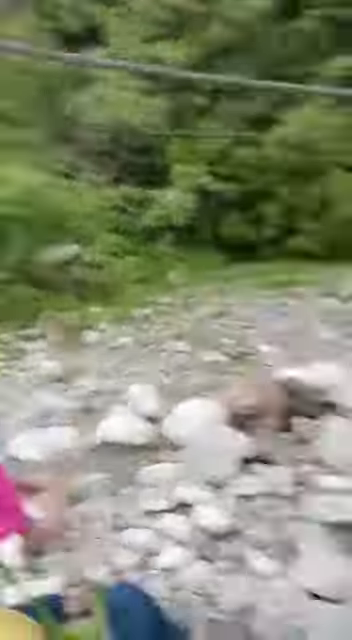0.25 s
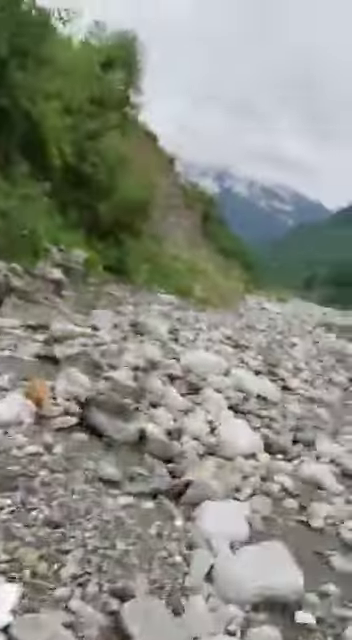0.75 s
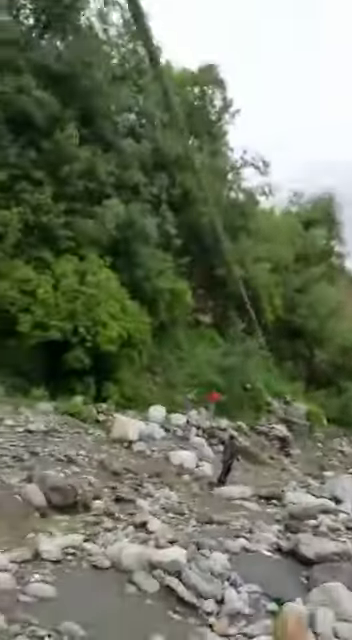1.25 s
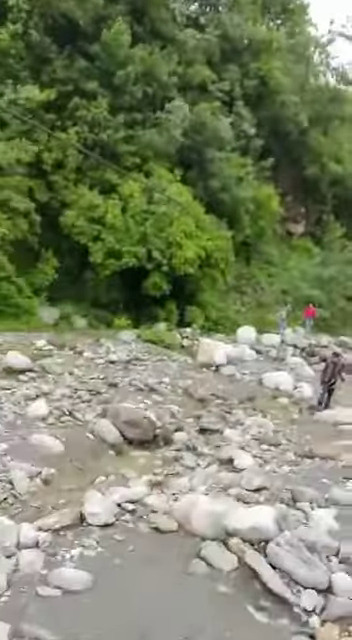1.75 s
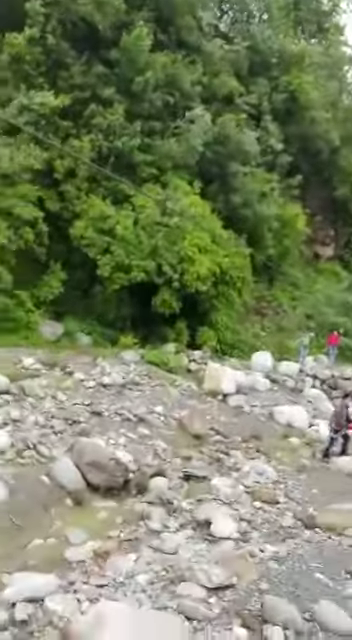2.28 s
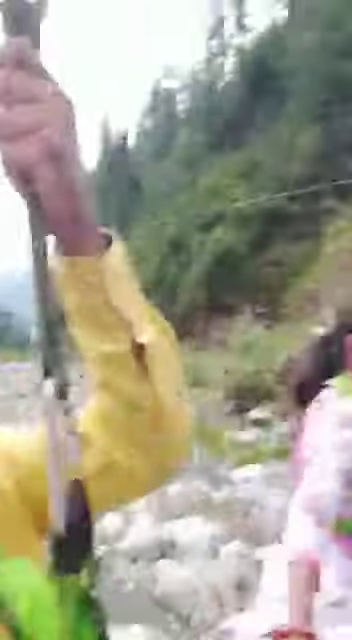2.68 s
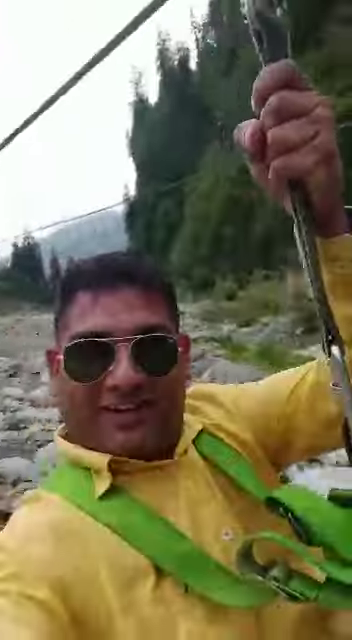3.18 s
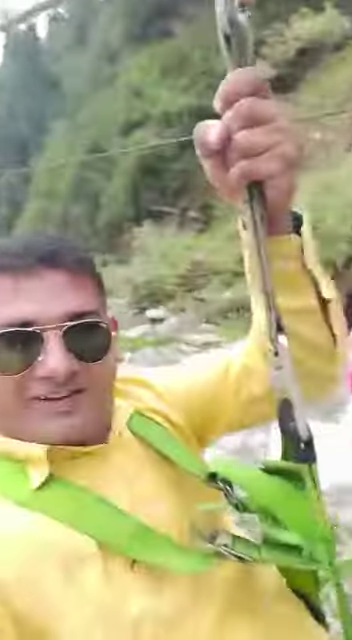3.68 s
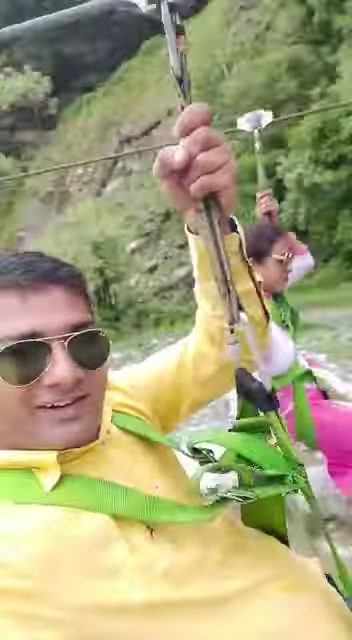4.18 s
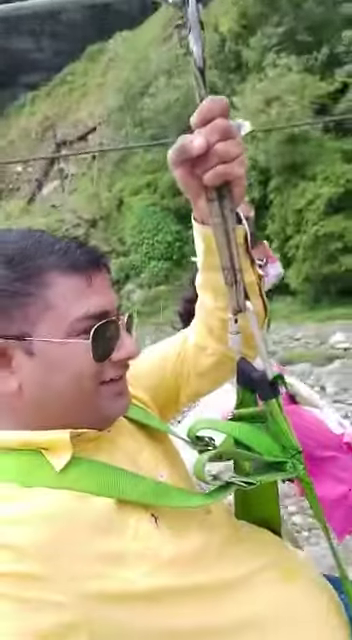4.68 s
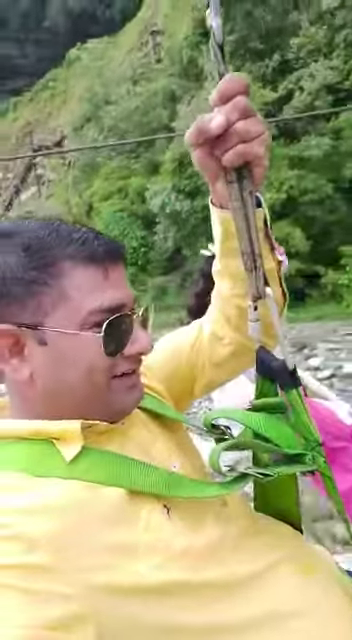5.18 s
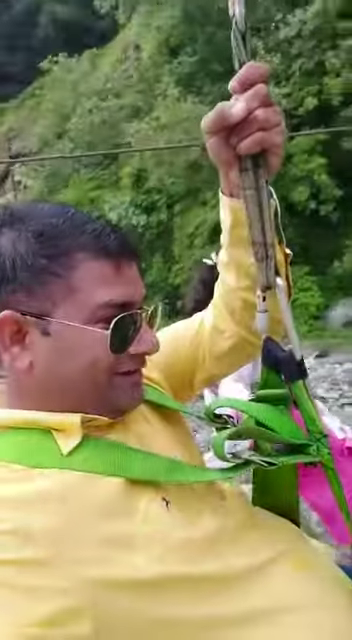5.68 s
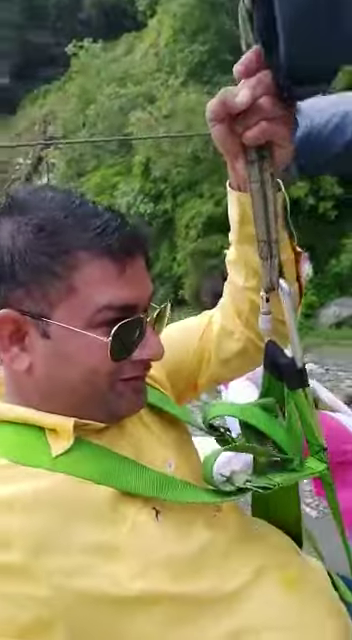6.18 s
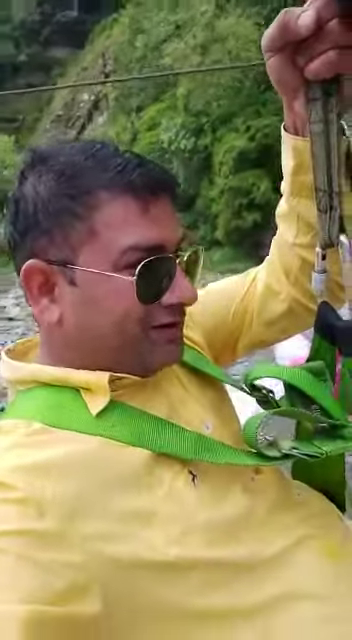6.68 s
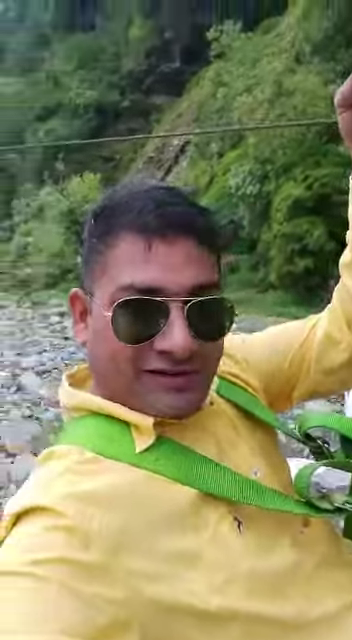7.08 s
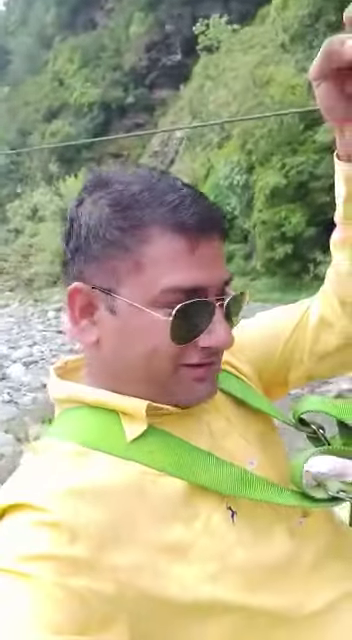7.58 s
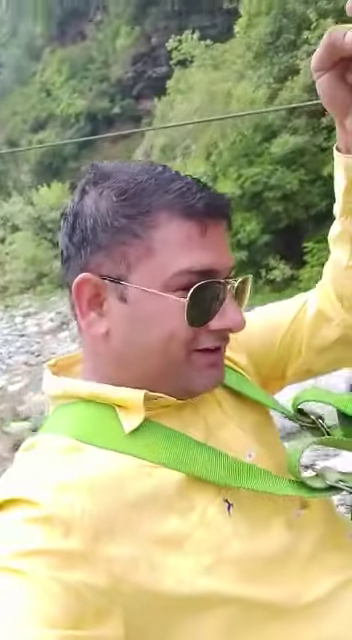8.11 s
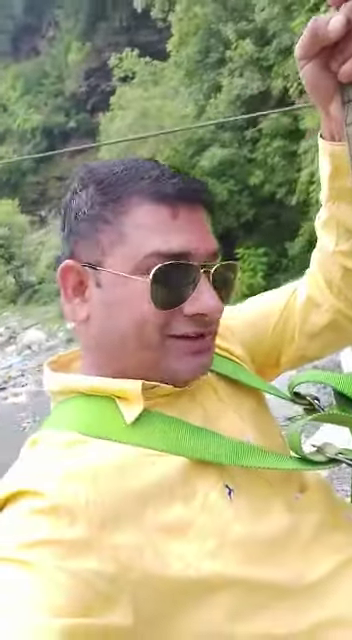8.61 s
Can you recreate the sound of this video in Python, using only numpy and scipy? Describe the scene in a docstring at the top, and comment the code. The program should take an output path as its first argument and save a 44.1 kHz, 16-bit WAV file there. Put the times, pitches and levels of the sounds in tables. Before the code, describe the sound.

Metal pulley wheels whir and hiss loudly along a twisted steel cable, buzz slowly sinking in pitch, with wind thumps and a late low hum.

```python
"""Zipline ride above a river

A trolley rolls along a twisted steel cable, heard in stereo from a phone in the rider's free hand.
Strands passing under the wheels press them in a slowly falling buzz; it modulates filtered noise: whir, rasp, hiss.
Decaying resonators make flange knocks; sines on the strand rate make wheel singing and a late cable hum.
Shaped noise makes the cable rumble, wind, bumps of air on the microphones, hand scuffs and the stony river.
"""
import sys
import numpy as np
from scipy import signal
from scipy.fft import rfft, irfft, next_fast_len
from scipy.io import wavfile
from scipy.ndimage import uniform_filter1d, map_coordinates

SR = 44100
rng = np.random.default_rng(int(sys.argv[2]) if len(sys.argv) > 2 else 0)


def unload_audio(sound):
    """Save the sound as a 16-bit wav file, at the path given as the first command line argument."""
    columns = np.transpose(np.atleast_2d(sound))
    # keep every value between -1 and 1, then stretch to whole-number steps
    steps = np.round(np.clip(columns, -1, 1) * 32767)
    wavfile.write(sys.argv[1], SR, steps.astype(np.int16))


N = 390285
TIME = np.arange(N) / SR
FFT_SIZE = next_fast_len(N)
BIN_HZ = np.maximum(np.fft.rfftfreq(FFT_SIZE, 1 / SR), 1)

# Ride speed: (time [s], strands passing [1/s])
STRAND_RATE = [(0, 291.5), (1.1, 274.5), (3.1, 246), (5.6, 212.5), (6.6, 197), (7.6, 176.5), (8.85, 152)]
CRUISE_STRANDS_PER_S = 250

# Wheel-on-cable friction spectrum: (frequency [Hz], relative density [dB])
FRICTION_COLOUR = [(100, -48), (300, -16), (700, -14), (1200, -8.5), (1500, -6.5), (2300, -0.5),
                   (3300, -7.5), (4700, -11.5), (6300, -11), (8000, -11), (11000, -6.5), (14000, -9),
                   (16000, -15)]
# Side plate and frame resonances: (centre [Hz], width [Hz], lift [dB])
HOUSING_MODES = [(1398, 170, 6), (1720, 50, 6.5), (2016, 220, 2.5), (2543, 490, 7), (2965, 130, 4.5),
                 (3820, 400, 1.5), (4384, 114, 8), (5160, 160, 2.5), (5440, 140, 2.5), (6160, 250, 4),
                 (6920, 430, 2.5), (8810, 540, 4), (9910, 250, 4), (11900, 710, 0.5), (15150, 490, 10.5)]
# Wheel rim ringing: (centre [Hz], nominal width [Hz], relative level [dB])
RIM_MODES = [(3313, 300, 7), (4285, 130, 5), (6280, 340, 3)]
# Trolley level at the phone: (time [s], level [dB], hiss against it [dB])
TROLLEY_LEVEL = [(0, 2, 1), (.45, -.5, -3), (.9, 0.5, 3), (1.5, 0.5, -0.5), (2.3, -1, -1), (2.55, 1, -3),
                 (3.05, 1.5, -1.5), (3.65, 0.54, 3), (4.18, 0.5, 1.5), (4.28, -0.4, 0), (4.95, 0, 1),
                 (5.74, -2, 2), (5.86, -5.5, -1.5), (6.45, -5.5, -1.5), (7.3, -7, -2.5), (8.4, -8.5, -4),
                 (8.85, -7.5, -4)]
# Wheels bite harder: (time [s], whir lift [dB], bell sigma [s])
BITE_SURGES = [(.1, 1.5, 0.042), (.92, 0, 0.028), (1.16, 3.5, 0.049), (3.75, 2, 0.028), (3.91, 1.5, 0.015),
               (4.11, 1, .035), (5.46, 2.5, 0.032), (6.9, 2.5, 0.035), (8.09, 2.5, 0.054), (8.2, 2, .025),
               (8.65, 1.5, 0.045)]
# Base levels at cruising speed, before the curves above
WHIR_DB, RASP_DB, HISS_DB = -19.5, -20, -23
WHIR_DB_PER_OCTAVE = -5  # of speed: a slower trolley sounds duller
SPARKLE_DB, SPARKLE_DB_PER_OCTAVE = 0, 2  # fine hiss against coarse, at cruise and per octave of speed
BUMP_DEPTH = 0.47  # log force modulation by the strands
SURGE_TREBLE_SHARE = 0.7  # of surge and cover dB, in rasp and hiss
# Hand over the microphones; dB applies in full to the whir
COVER_S, COVER_SIGMA_S, COVER_DB = 5.865, 0.016, -6.5

# Phone turned away: ramps centred on from/to; blur is the share of bump depth lost
AWAY_FROM_S, AWAY_TO_S, TURN_AWAY_S, TURN_BACK_S = 1.05, 3.01, 0.25, 0.79
AWAY_WHIR_DB, AWAY_SPARKLE_DB, AWAY_BLUR = -6.5, 2.5, 0.43
AWAY_THIN_HZ, AWAY_THIN_SIGMA_HZ, AWAY_THIN_DB, AWAY_RIVER_DB = 750, 260, -1.5, -1.5

# Trolley direction: (time [s], right microphone lag [ms], right treble lag [ms])
RIGHT_LAG = [(0, 0.28, 0.27), (.25, 0.255, 0.27), (.45, 0.29, 0.32), (.65, .335, 0.32), (.85, .44, 0.43),
             (1.0, 0.51, 0.48), (1.25, 0.48, 0.51), (1.8, 0.41, 0.47), (2.4, 0.44, 0.47), (2.62, 0.3, 0.38),
             (2.95, 0.36, 0.37), (3.5, 0.31, 0.32), (3.9, .34, .35), (4.18, 0.33, .34), (4.35, 0.3, .3),
             (4.52, 0.27, 0.277), (4.75, 0.34, .33), (6.1, 0.33, .33), (6.6, 0.4, .39), (6.9, 0.39, 0.38),
             (7.2, 0.34, .35), (7.8, 0.36, 0.38), (8.85, 0.37, 0.37)]
# Phase offset of the right channel: (frequency [Hz], offset [degrees, + later, - earlier])
RIGHT_PHASE_OFFSET = [(800, -5), (1600, -8), (2600, 0.5), (3300, 12), (4000, 18), (5000, 15), (6000, 1),
                      (8500, -19), (11000, -4), (14000, 15)]
TREBLE_LAG_FROM_HZ = 3570  # sound above this takes the treble lag
# Straight arrival: (frequency [Hz], share of power [0-1])
DIRECT_SHARE = [(100, 0), (600, 0.12), (1400, 0.93), (1900, 0.96), (2800, 0.86), (3950, 0.8), (4370, 0.67),
                (4900, 0.86), (6000, 0.82), (7500, 0.72), (9000, 0.55), (15000, 0.38)]
# Rim ringing and detour sound: (time [s], rim against rasp [dB], scatter against straight [dB])
RIM_AND_SCATTER = [(0, -7, -1), (1.15, -9, -0.5), (1.5, -1.5, 1), (2.7, -2.5, 4.5), (3.3, -10, 1),
                   (4.6, -32, -5), (5.7, -28, -1), (6.0, -9, 4), (8.85, -19, 6.5)]
# Echoes off the swaying rider: (mean delay [ms], level [dB])
RIDER_ECHOES = [(1.7, -18), (2.9, -14.5), (4.3, -14), (6.1, -15.5)]
# Treble glancing off the fingers: (time [s], level [dB])
FINGER_ECHO_LEVEL = [(0, -24), (1, -25), (2, -31), (3.5, -19), (4.3, -18), (5.7, -11), (6.3, -13),
                     (8.85, -15)]
FINGER_ECHO_MS, FINGER_ECHO_MS_PER_LAG_MS = 0.234, 1.708
# Case shading: (frequency [Hz], left gain [dB], the right gets the opposite)
CASE_SHADE = [(1000, 0), (3000, .2), (6000, .45), (15000, .8)]

# Sliding bands; negative lift is a dip, positive a boost
# Treble hollow: (time [s], centre [Hz], lift [dB])
TREBLE_HOLLOW = [(0, 8900, -9.5), (.28, 8700, -4), (.4, 9000, 0.5), (.75, 8500, -0.5), (.88, 8900, -8.5),
                 (1.1, 12500, -4.5), (1.25, 14800, 2), (1.42, 13400, -5), (2.4, 13200, 1), (2.58, 9300, -3),
                 (2.8, 8060, -3.5), (2.95, 8000, 1.2), (4.15, 13000, 0.5), (4.42, 13700, 1),
                 (4.8, 12900, -2), (6.3, 13400, -1.5), (8.85, 13800, -6)]
# Lower hollow: (time [s], centre [Hz], lift [dB])
LOWER_HOLLOW = [(0, 5800, 5), (.75, 5750, -6), (1.1, 5700, 3), (1.5, 5650, -4), (2.3, 5600, 1),
                (2.55, 4600, 3), (2.85, 3980, -8), (4.1, 4120, 0), (4.4, 4900, -5), (5.7, 4850, -3.5),
                (6.4, 4600, -2), (8.85, 4650, 1)]
# Hollow near 11 kHz: (time [s], centre [Hz], lift [dB])
THIRD_HOLLOW = [(0, 11300, -4), (.5, 11400, -2), (1.6, 11000, -2), (3.1, 10800, -0.5), (4.1, 10700, -2),
                (4.45, 10950, -2), (5.7, 11300, -2), (6.7, 11000, -4), (7.4, 11000, -1), (8.85, 11200, -3)]
# Bright band: (time [s], centre [Hz], lift [dB])
BRIGHT_BAND = [(0, 11500, -2), (.7, 10800, -1), (.95, 7160, 7), (1.1, 9500, -1), (1.28, 13000, 0),
               (1.42, 11600, 4.5), (2.5, 11700, 1.5), (2.85, 9900, 4), (3.2, 9900, 3.5), (4.15, 8600, -4),
               (4.3, 7800, 4.5), (5.8, 8000, 2), (5.95, 8300, -2), (6.25, 12500, 1), (8.85, 12500, 9)]
TREBLE_HOLLOW_SIGMA_HZ, LOWER_HOLLOW_SIGMA_HZ = 1230, 155
THIRD_HOLLOW_SIGMA_HZ, BRIGHT_SIGMA_HZ = 340, 350
# Four bands whose level rises and falls along the ride: (centre [Hz], bell sigma [Hz])
VARYING_BANDS = [(2340, 91), (4370, 64), (9970, 210), (15240, 230)]
# Their lift along the ride: (time [s], lift of each band, low to high [dB] x 4)
VARYING_BAND_LIFT = [(0, -1.5, -5, -4, -3), (.75, 3, -6, -1, -6), (1.1, 3.5, 6, 1.5, -2),
                     (1.5, 1, -1, -0.5, 0), (2.6, -2, -1, 3, -2), (3.2, -0.5, 2, -4, -4),
                     (3.95, 1, 1, 1, -1), (4.5, 1.5, -3, 2.5, -2), (5.7, -2, 2, -1.5, 1),
                     (6.3, -0.5, -6.5, -1.5, -7), (7.4, 0.5, -1, -3, -5), (8.85, -1.5, -1, -1.5, -1)]

# Flange clips the cable: (time [s], impulse level [dB])
FLANGE_GRAZES = [(.548, -14), (1.158, -10), (4.213, -12), (5.466, -12), (6.235, -14), (8.092, -7.5),
                 (8.104, -16), (8.405, -13), (8.449, -9)]
# Grazed side plate modes: (centre [Hz], width [Hz], level [dB])
CLINK_MODES = [(1950, 170, -6), (2560, 270, 3), (3300, 450, -4), (5200, 1200, -7)]
# Wheel singing: (time [s], level at 1, 2, 3 and 4 times strand rate [dB] x 4)
WHEEL_SINGING = [(0, -55, -48, -40, -41), (.7, -51, -52, -42, -48), (1.3, -48.5, -51, -51, -54),
                 (1.9, -48, -45.5, -58, -53), (2.5, -50, -52, -56, -45), (3.3, -44.5, -48, -52, -41),
                 (4, -48, -47, -50, -41), (4.6, -52, -55, -53, -46), (6, -59, -55, -55, -55)]

# Cable rumble: (time [s], level [dB])
RUMBLE_LEVEL = [(0, -38.5), (5.0, -56), (5.6, -29.5), (6.3, -26.5), (7.2, -22.5), (8.85, -23)]
# Cable rumble spectrum: (frequency [Hz], relative density [dB])
RUMBLE_COLOUR = [(50, -10), (120, 1), (200, 1.5), (340, 2), (500, -1), (650, -3.5), (900, -0.5), (1300, -9),
                 (1550, -9), (1780, 5.5), (2050, 2), (2600, -24)]
# Cable hum before its fade-in: (time [s], level at 1, 2 and 3 times strand rate [dB] x 3)
CABLE_HUM = [(6.1, -55, -53, -54), (6.4, -32, -34, -45), (6.7, -28, -34.5, -38), (7.15, -26, -36, -34),
             (7.7, -29, -32.5, -34.5), (8.5, -29.5, -33, -36), (8.85, -45, -36, -44)]
HUM_FROM_S, HUM_ATTACK_S = 6.1, 0.26

# Air past the phone: (time [s], level before lean [dB])
WIND_LEVEL = [(0, -44), (.7, -47), (1.2, -38), (2.3, -35.5), (2.9, -40), (3.3, -60), (4.4, -39.5),
              (4.95, -30.5), (6.3, -31), (7.4, -38.5), (8.85, -37)]
# Wind spectrum: (frequency [Hz], relative density [dB])
WIND_SPECTRUM = [(20, -28), (40, -7), (70, 2.5), (110, -0.5), (200, -4.5), (350, -17), (800, -50),
                 (2000, -61)]
# Weak flow misses the right microphone: extra left lean per dB below the threshold
LEE_BELOW_DB, LEE_DB_PER_DB, WIND_LEAN_DB = -37.5, 1.1, 1.8
# Eddies on the microphones: (time [s], thud [dB], puff [dB], bell sigma [s], lean [dB, + left, - right])
EDDIES = [(0.323, -24, -30.5, .009, -1), (0.863, -23, -28, 0.0093, 0.5), (0.941, -42, -27.5, 0.0061, -2),
          (1.012, -25, -38, .016, -2), (1.21, -24, -41, .016, 0), (1.52, -28, -41, 0.0095, -2),
          (1.897, -34, -39, 0.011, -4), (2.567, -19.5, -29, 0.011, -0.5), (2.698, -31, -44, .014, 7),
          (2.751, -28, -23, 0.0085, 2.5), (2.8, -21.5, -30, 0.013, 3), (2.916, -29, -49, 0.01, 8),
          (2.998, -32, -45, 0.013, 9), (4.466, -22.5, -28, 0.01, 1), (4.563, -20.5, -20, .012, 1.5),
          (4.812, -26.5, -39, 0.013, 1), (4.953, -32, -32, 0.011, 1.5), (5.037, -24, -30, 0.0084, 0),
          (5.2, -37, -30, 0.0074, 0), (5.477, -26, -39, .014, -3), (5.68, -23.5, -30, .011, 0),
          (5.837, -27, -31, 0.011, 3), (5.91, -27, -24, 0.014, 1), (5.975, -31, -24, 0.015, -2),
          (6.235, -19.5, -22, 0.013, 0.5), (6.314, -24, -28, 0.013, 1), (6.374, -26, -25, 0.013, -2)]
# Eddy thud spectrum: (frequency [Hz], relative density [dB])
THUD_SPECTRUM = [(20, -14), (45, -2), (85, 9.5), (125, 3.5), (190, -26), (400, -50)]
# Eddy puff spectrum: (frequency [Hz], relative density [dB])
PUFF_SPECTRUM = [(70, -19), (160, -1), (250, -3), (400, -7), (600, -32), (1500, -34)]

# Hand shifts on the phone: (time [s], level [dB], bell sigma [s])
HAND_RUBS = [(2.72, -31, 0.11), (5.91, -23, 0.027)]
# Scuff spectrum: (frequency [Hz], relative density [dB])
RUB_SPECTRUM = [(60, -8), (200, -6), (500, 5.5), (1100, 2.5), (2000, 0), (5000, -35)]
# River spectrum: (frequency [Hz], relative density [dB])
RIVER_COLOUR = [(60, -23), (150, -15), (400, -6.5), (950, -6.5), (1700, -11), (4000, -17.5), (16000, -50)]
RIVER_DB = -38  # while the phone faces the trolley
CUTOFF_HZ = 15800


def trolley(phase, whir_top_hz=3100, rasp_top_hz=7500, hiss_top_hz=11300, judder_db=0.5,
            whir_rough_db=1.5, rasp_rough_db=1.0, coarse_rough_db=2.0, fine_rough_db=2.0,
            rasp_bump=0.56, hiss_bump=0.47):
    """Each strand presses the wheels once; the friction sounds through housing and rims."""
    whir_db, rasp_db, hiss_db = roll_levels()
    away = turned_away()
    rim_db, scatter_db = in_time(RIM_AND_SCATTER)
    bump = BUMP_DEPTH * (1 - AWAY_BLUR * away) * (np.cos(phase) + 0.12 * np.cos(2 * phase))
    load = from_db(judder_db * drift(40))

    housing_db = sum(db * resonance(hz, width) for hz, width, db in HOUSING_MODES)
    body = from_db(at_hz(FRICTION_COLOUR) + housing_db)
    rims = np.sqrt(sum(from_db(db) ** 2 * resonance(hz, width) ** 2 for hz, width, db in RIM_MODES))
    whir_band = below(whir_top_hz)
    rasp_band = below(rasp_top_hz) * (1 - below(whir_top_hz))
    coarse_band = below(hiss_top_hz) * (1 - below(rasp_top_hz))
    fine_band = 1 - below(hiss_top_hz)

    # heavy housing follows the strands most closely, fine hiss least
    whir_force = load * np.exp(bump) * from_db(whir_rough_db * drift(140))
    whir = rubbing(whir_force, body * np.sqrt(whir_band))

    rasp_force = load * np.exp(rasp_bump * bump) * from_db(rasp_rough_db * drift(190))
    rasp_force = rasp_force * grit(per_s=65, size=.3, decay_s=0.0022)
    rasp = rubbing(rasp_force, body * np.sqrt(rasp_band))
    rim_gain = from_db(rim_db)
    rasp = (rasp + rim_gain * rubbing(load, rims)) / np.hypot(1, rim_gain)

    # coarse and fine steel roughness sizzle independently
    hiss_force = load * np.exp(hiss_bump * bump) * grit(per_s=220, size=.3, decay_s=0.00055)
    coarse_force = hiss_force * from_db(coarse_rough_db * drift(130))
    coarse = rubbing(coarse_force, body * np.sqrt(coarse_band))
    fine_force = hiss_force * from_db(fine_rough_db * drift(110))
    fine = rubbing(fine_force, body * np.sqrt(fine_band))
    fine_db = SPARKLE_DB + SPARKLE_DB_PER_OCTAVE * speed_octaves() + AWAY_SPARKLE_DB * away
    fine_gain = from_db(fine_db)
    hiss = (coarse + fine_gain * fine) / np.hypot(1, fine_gain)

    paths = from_db(whir_db) * whir + from_db(rasp_db) * rasp + from_db(hiss_db) * hiss
    return shaded(shifting_colour(to_phone(paths, scatter_db)))


def strand_phase(wobble_hz=1.333):
    """One turn per strand; the lay of the cable is slightly uneven."""
    rate, = in_time(STRAND_RATE)
    return 2 * np.pi * np.cumsum(rate + wobble_hz * drift(14.05)) / SR


def speed_octaves():
    """Ride speed in octaves above cruising."""
    return np.log2(in_time(STRAND_RATE)[0] / CRUISE_STRANDS_PER_S)


def roll_levels(waver_db=0.49, own_waver_db=0.86):
    """Whir, rasp and hiss dB: a shared wavering level plus speed, surges, cover and phone turn."""
    level_db, treble_db = in_time(TROLLEY_LEVEL)
    level_db = level_db + waver_db * drift(12.0)
    surge_db = swells(BITE_SURGES) + swells([(COVER_S, COVER_DB, COVER_SIGMA_S)])
    whir_db = WHIR_DB + surge_db + WHIR_DB_PER_OCTAVE * speed_octaves() + AWAY_WHIR_DB * turned_away()
    rasp_db = RASP_DB + SURGE_TREBLE_SHARE * surge_db
    hiss_db = HISS_DB + SURGE_TREBLE_SHARE * surge_db + treble_db
    return [level_db + db + own_waver_db * drift(4.2) for db in (whir_db, rasp_db, hiss_db)]


def rubbing(force, response):
    """Tiny contacts as force-modulated noise; rows: straight path, scatter left, scatter right."""
    straight = np.clip(at_hz(DIRECT_SHARE), 0, 1)
    shares = np.sqrt([straight, 1 - straight, 1 - straight])
    return coloured(rms_one(force) * rng.standard_normal((3, N)), rms_one(response) * shares)


def grit(per_s, size, decay_s):
    """Specks on the cable give sudden, quickly fading spikes of force."""
    specks = (rng.random(N) < per_s / SR) * np.minimum(rng.exponential(1, N), 4)
    fade = np.exp(-1 / (decay_s * SR))
    return 1 + size * signal.lfilter([1], [1, -fade], specks + 1e-18)  # offset avoids denormals


def turned_away():
    """0 while the phone faces the trolley, 1 while it is turned away."""
    return held(AWAY_FROM_S, AWAY_TO_S, TURN_AWAY_S, TURN_BACK_S)


def to_phone(paths, scatter_db, sway_ms=0.13):
    """Straight sound and swaying echoes cross both microphones; scatter fills in around them."""
    straight = paths[0]
    echoes = sum(from_db(db) * delayed(straight, ms + sway_ms * drift(1.0)) for ms, db in RIDER_ECHOES)
    straight = straight + echoes
    lag_ms, treble_lag_ms = in_time(RIGHT_LAG)
    low = coloured(straight, below(TREBLE_LAG_FROM_HZ))
    treble = straight - low
    glance = from_db(in_time(FINGER_ECHO_LEVEL)[0])
    detour_ms = FINGER_ECHO_MS + FINGER_ECHO_MS_PER_LAG_MS * treble_lag_ms
    treble = (treble + glance * delayed(treble, detour_ms)) / np.hypot(1, glance)
    right = delayed(low, lag_ms) + delayed(treble, treble_lag_ms)
    right = coloured(right, np.exp(-1j * np.radians(at_hz(RIGHT_PHASE_OFFSET))))
    return np.array([low + treble, right]) + from_db(scatter_db) * paths[1:]


def shifting_colour(x):
    """Time-varying filter: sliding hollows and bright band, four varying bands, thinned middle."""
    hz, s, frames = signal.stft(x, SR, nperseg=512)
    hz = hz[:, None]

    def at_frames(rows):
        """Each column of a curve at every frame."""
        times, *columns = np.transpose(rows)
        return [np.interp(s, times, column) for column in columns]

    db = 0
    for lift_db, (centre_hz, sigma_hz) in zip(at_frames(VARYING_BAND_LIFT), VARYING_BANDS):
        db = db + lift_db * bell(hz, centre_hz, sigma_hz)
    bands = ((TREBLE_HOLLOW, TREBLE_HOLLOW_SIGMA_HZ), (LOWER_HOLLOW, LOWER_HOLLOW_SIGMA_HZ),
             (THIRD_HOLLOW, THIRD_HOLLOW_SIGMA_HZ), (BRIGHT_BAND, BRIGHT_SIGMA_HZ))
    for rows, sigma_hz in bands:
        centre_hz, lift_db = at_frames(rows)
        db = db + lift_db * bell(hz, centre_hz, sigma_hz)
    thin_db = AWAY_THIN_DB * np.interp(s, TIME, turned_away())
    db = db + thin_db * bell(hz, AWAY_THIN_HZ, AWAY_THIN_SIGMA_HZ)
    return signal.istft(frames * from_db(db), SR)[1][:, :N]


def shaded(x):
    """The case shades the right microphone: higher frequencies lean further left."""
    return coloured(x, from_db(at_hz(CASE_SHADE) * [[1], [-1]]))


def grazes():
    """Each flange touch is one impulse that rings briefly in damped side plate modes."""
    knocks, out = np.zeros(N), 0
    for s, db in FLANGE_GRAZES:
        knocks[int(s * SR)] = from_db(db)
    for hz, width_hz, db in CLINK_MODES:
        r = np.exp(-np.pi * width_hz / SR)
        w = 2 * np.pi * hz / SR
        ring = signal.lfilter([0, np.sin(w)], [1, -2 * r * np.cos(w), r * r], knocks + 1e-18)
        out = out + from_db(db) * ring
    return right_lags(out)


def wheels(phase):
    """The wheels sing faintly on multiples of the strand rate."""
    return right_lags(harmonics(WHEEL_SINGING, phase, waver_db=3, slip_rad=0.3))


def cable(phase, throb=0.1):
    """The taut cable hums on multiples of the strand rate over a throbbing rumble."""
    drone_db, = in_time(RUMBLE_LEVEL)
    hum = harmonics(CABLE_HUM, phase, waver_db=3, slip_rad=.34)
    fade_in = np.clip((TIME - HUM_FROM_S) / HUM_ATTACK_S, 0, 1)
    throbbing = rng.standard_normal(N) * (1 + throb * np.cos(phase))
    rumble = rms_one(coloured(throbbing, from_db(at_hz(RUMBLE_COLOUR))))
    return right_lags(from_db(drone_db) * rumble + fade_in * hum)


def harmonics(curve, phase, waver_db, slip_rad):
    """Wavering sines on 1, 2, 3... times the strand rate."""
    turn = phase + slip_rad * drift(8.2)
    return sum(from_db(db + waver_db * drift(24)) * np.sin(k * turn)
               for k, db in enumerate(in_time(curve), 1))


def right_lags(x):
    """Sound from the trolley reaches the right microphone a little later."""
    return np.array([x, delayed(x, in_time(RIGHT_LAG)[0])])


def wind(lumpy_db=4.0, shared=0.45):
    """Lumpy turbulence at each microphone port: partly shared low noise."""
    flow_db, = in_time(WIND_LEVEL)
    lean_db = WIND_LEAN_DB + LEE_DB_PER_DB * np.maximum(LEE_BELOW_DB - flow_db, 0)
    air = rng.standard_normal((2, N)) + shared * rng.standard_normal(N)
    lumps = from_db(lumpy_db * np.minimum([drift(29), drift(18)], 1))
    turbulence = rms_one(coloured(air * lumps, from_db(at_hz(WIND_SPECTRUM))))
    return panned(from_db(flow_db) * turbulence, lean_db)


def buffets(shared=0.77):
    """Single eddies strike the ports: bell-shaped thuds and puffs of levelled noise."""
    out = 0
    for column, colour in enumerate((THUD_SPECTRUM, PUFF_SPECTRUM)):
        air = rng.standard_normal((2, N)) + shared * rng.standard_normal(N)
        air = coloured(air, from_db(at_hz(colour)))
        # level the noise so that the table sets each strength
        air = air / np.sqrt(uniform_filter1d(np.mean(air ** 2, axis=0), size=1000) + 1e-12)
        strength = [bursts([(s, levels[column] + side * lean, sigma_s)
                            for s, *levels, sigma_s, lean in EDDIES]) for side in (1, -1)]
        out = out + np.array(strength) * air
    return out


def hand():
    """Skin dragging over the case gives short dull scuffs of noise."""
    skin = coloured(rng.standard_normal((2, N)), from_db(at_hz(RUB_SPECTRUM)))
    return bursts(HAND_RUBS) * rms_one(skin)


def river(spread=0.41):
    """Even rush of the water far below: mostly shared noise, softer while the phone is turned away."""
    water = rng.standard_normal(N) + spread * rng.standard_normal((2, N))
    rush = rms_one(coloured(water, from_db(at_hz(RIVER_COLOUR))))
    return from_db(RIVER_DB + AWAY_RIVER_DB * turned_away()) * rush


def from_db(db):
    """Decibels to gain."""
    return 10 ** (np.asarray(db) / 20)


def rms_one(x):
    """Scale to unit power."""
    return x / np.sqrt(np.mean(x ** 2) + 1e-20)


def in_time(rows):
    """Each column of a curve at every sample."""
    s, *columns = np.transpose(rows)
    return [np.interp(TIME, s, c) for c in columns]


def at_hz(points):
    """A spectrum table at every bin, interpolated over log frequency."""
    hz, value = np.transpose(points)
    return np.interp(np.log(BIN_HZ), np.log(hz), value)


def coloured(x, gain):
    """Filter by a gain per frequency bin."""
    return irfft(rfft(x, FFT_SIZE) * gain, FFT_SIZE)[..., :N]


def resonance(hz, width_hz):
    """Resonance curve of one mode, 1 at its centre."""
    return 1 / (1 + (2 * (BIN_HZ - hz) / width_hz) ** 2)


def below(hz):
    """Steep low-pass curve, 1/2 at hz."""
    return 1 / (1 + (BIN_HZ / hz) ** 20)


def drift(rate_hz):
    """Random wandering up to about this rate, RMS 1."""
    coarse = TIME[::16]
    hz = np.fft.rfftfreq(next_fast_len(len(coarse), real=True), coarse[1])
    slow = irfft(rfft(rng.standard_normal(2 * len(hz) - 2)) / (1 + (hz / rate_hz) ** 2))
    return np.interp(TIME, coarse, rms_one(slow[:len(coarse)]))


def delayed(x, ms):
    """Read a sound late by a fixed or changing delay."""
    return map_coordinates(x, [np.arange(N) - ms * SR / 1000], order=3, mode="nearest")


def panned(x, left_db):
    """Raise the left and lower the right by left_db."""
    return x * from_db(left_db * np.array([[1], [-1]]))


def bell(x, centre, sigma):
    """Bell curve, 1 at its centre."""
    return np.exp(-.5 * ((x - centre) / sigma) ** 2)


def swells(rows):
    """Sum of bells from rows of (time [s], height, sigma [s])."""
    out = np.zeros(N)
    for s, height, sigma_s in rows:
        reach_s = 6 * abs(sigma_s)
        near = slice(*np.searchsorted(TIME, [s - reach_s, s + reach_s]))
        out[near] += height * bell(TIME[near], s, sigma_s)
    return out


def bursts(rows):
    """Bells of gain from rows of (time [s], level [dB], sigma [s])."""
    return swells([(s, from_db(db), sigma_s) for s, db, sigma_s in rows])


def held(start_s, end_s, attack_s, release_s):
    """Rise to 1, hold and fall; the ramps are centred on start and end."""
    ramps = np.minimum((TIME - start_s) / attack_s, (end_s - TIME) / release_s)
    return np.clip(ramps + .5, 0, 1)


def scene():
    """Trolley, wheels and cable share one strand phase; wind, hand and river lie under them."""
    phase = strand_phase()
    ride = trolley(phase) + grazes() + wheels(phase) + cable(phase)
    return ride + wind() + buffets() + hand() + river()


def record(dry):
    """The phone clips at full scale and cuts the top."""
    return coloured(np.clip(dry, -1, 1), 1 / np.sqrt(1 + (BIN_HZ / CUTOFF_HZ) ** 500))


dry = scene()
out = record(dry)
unload_audio(out)
```